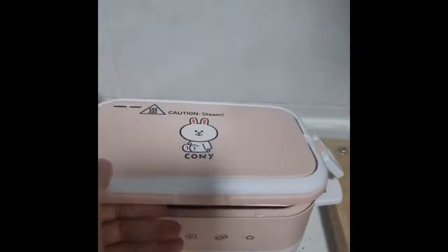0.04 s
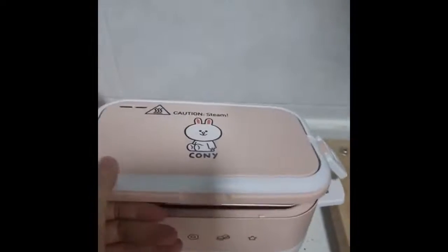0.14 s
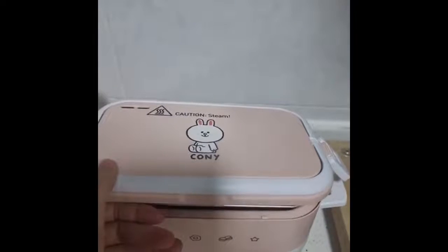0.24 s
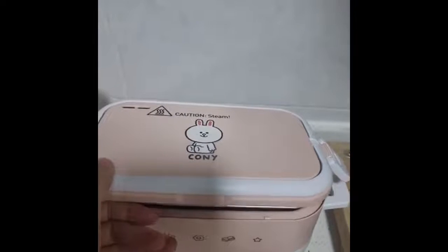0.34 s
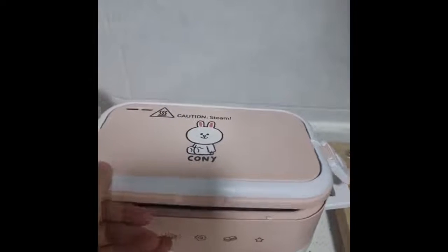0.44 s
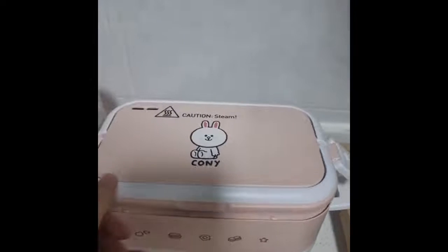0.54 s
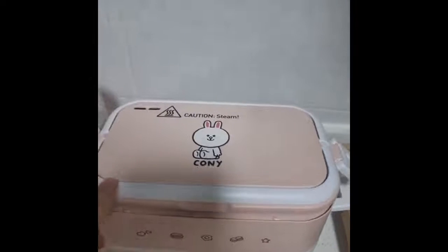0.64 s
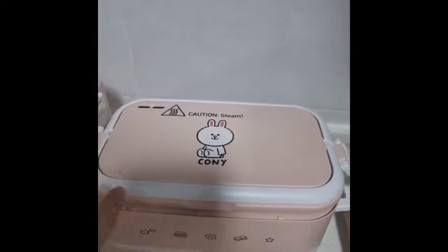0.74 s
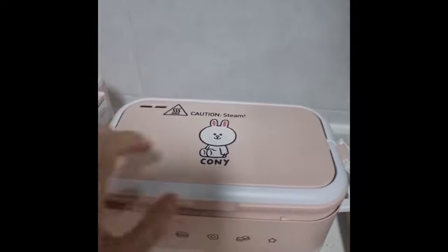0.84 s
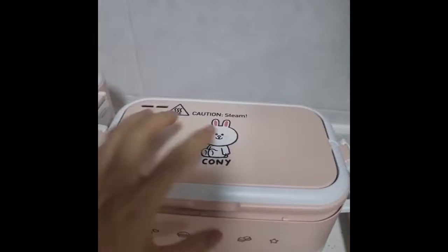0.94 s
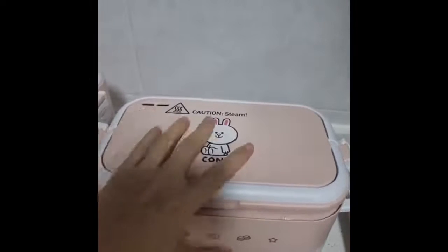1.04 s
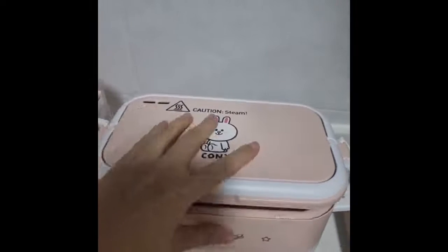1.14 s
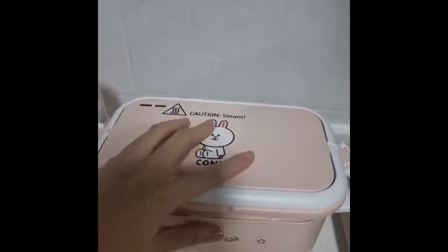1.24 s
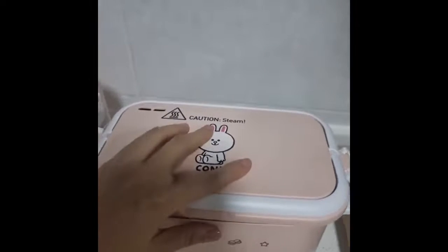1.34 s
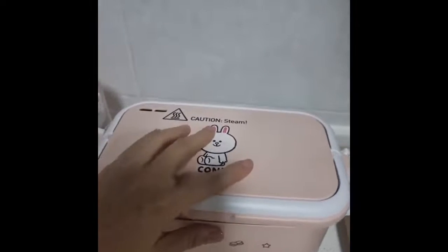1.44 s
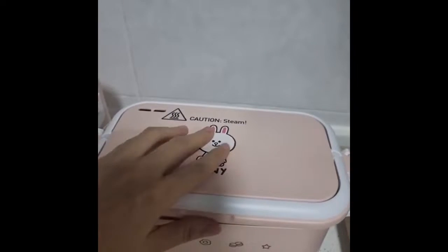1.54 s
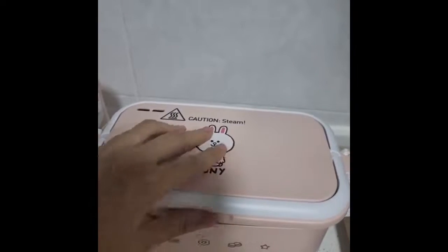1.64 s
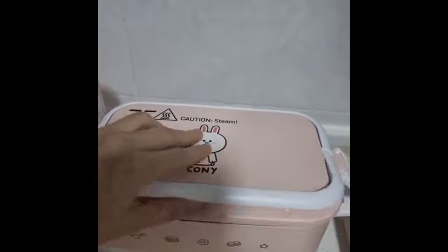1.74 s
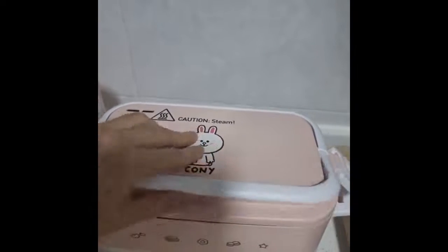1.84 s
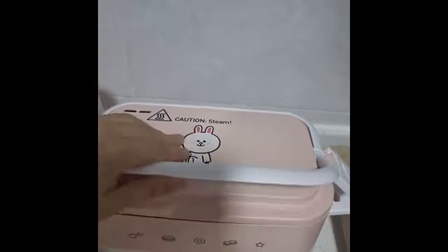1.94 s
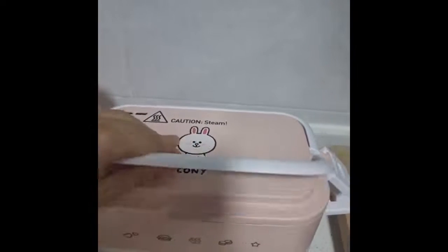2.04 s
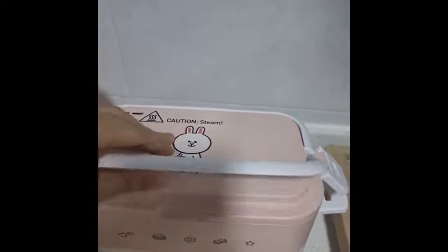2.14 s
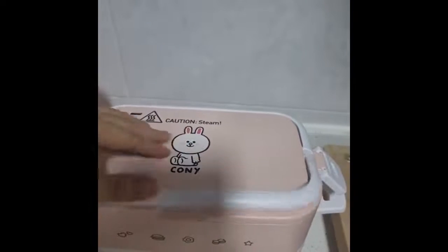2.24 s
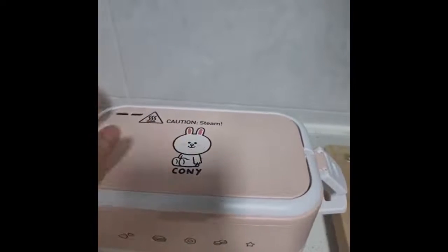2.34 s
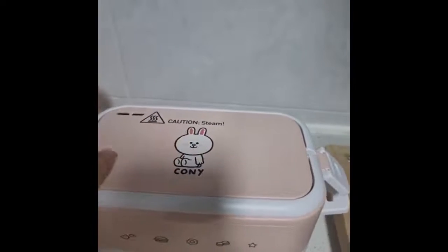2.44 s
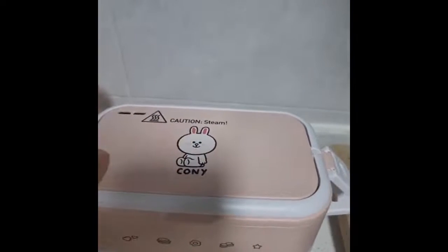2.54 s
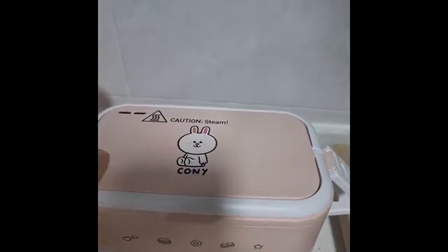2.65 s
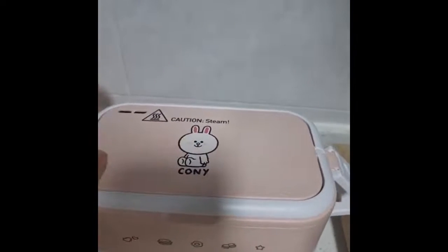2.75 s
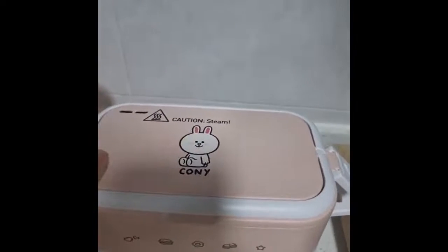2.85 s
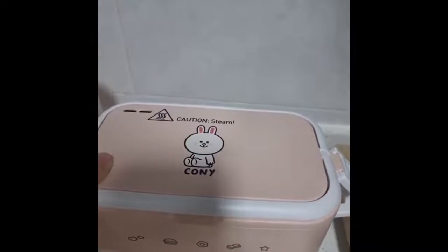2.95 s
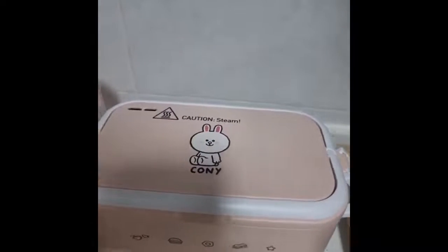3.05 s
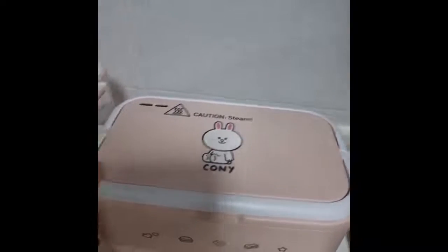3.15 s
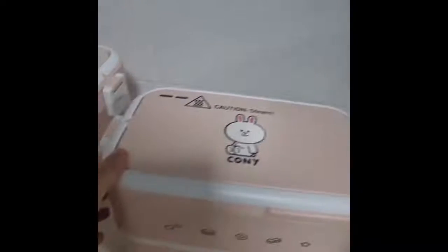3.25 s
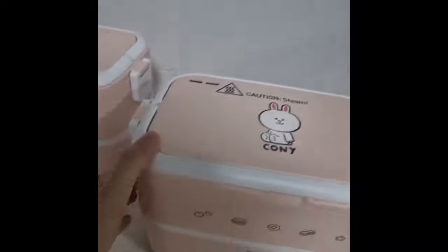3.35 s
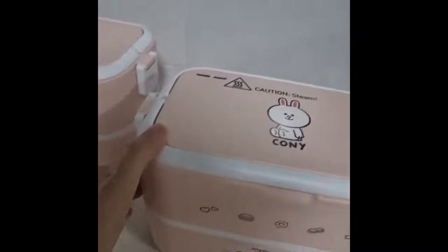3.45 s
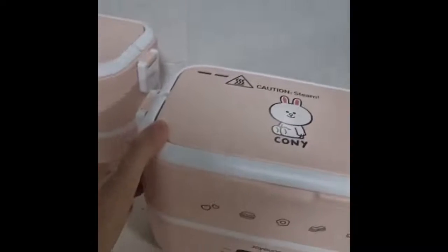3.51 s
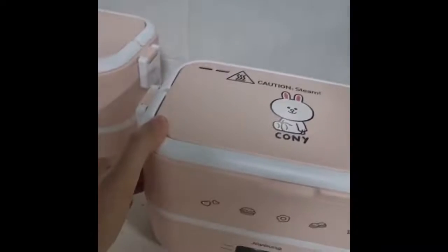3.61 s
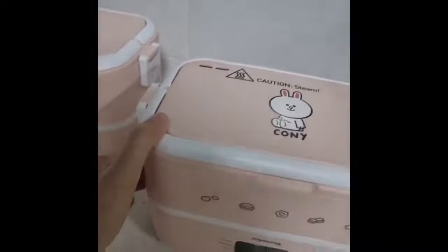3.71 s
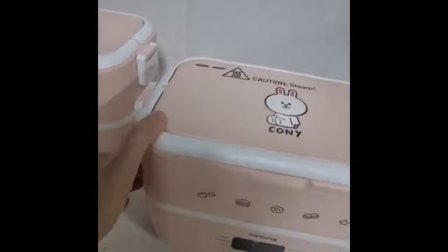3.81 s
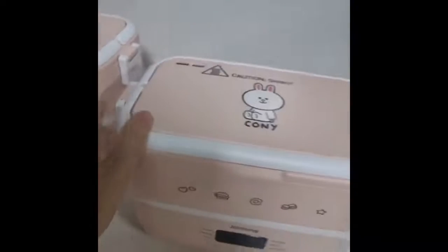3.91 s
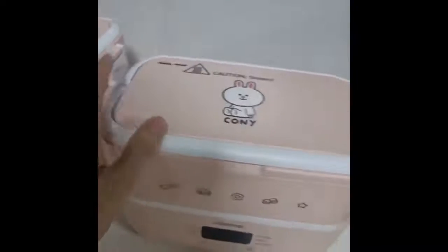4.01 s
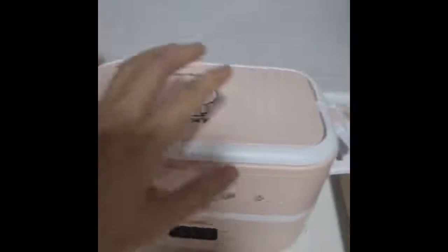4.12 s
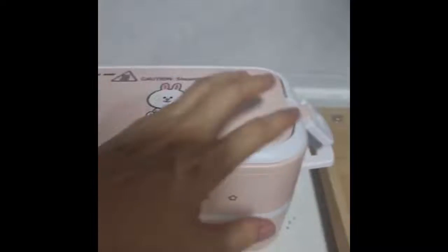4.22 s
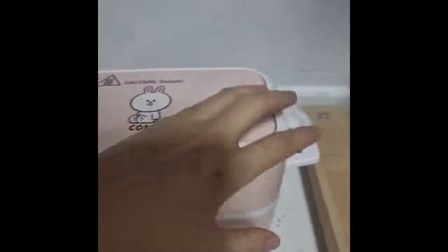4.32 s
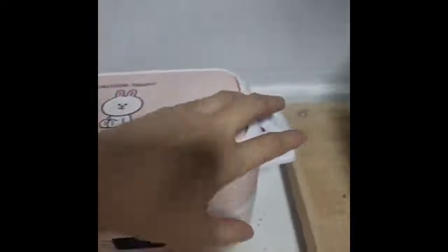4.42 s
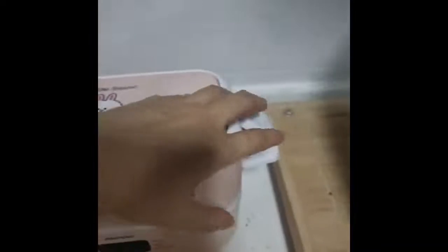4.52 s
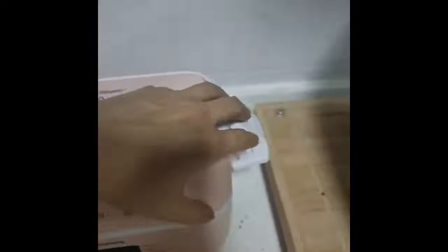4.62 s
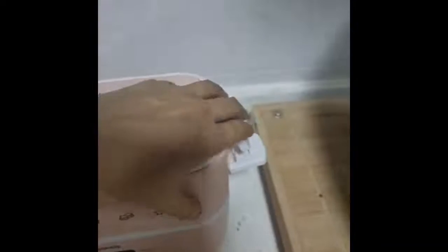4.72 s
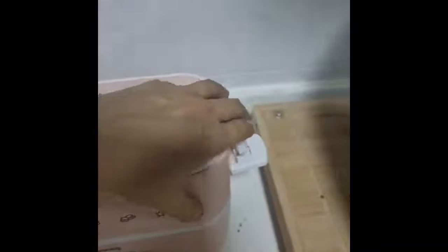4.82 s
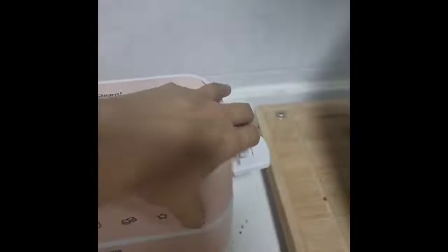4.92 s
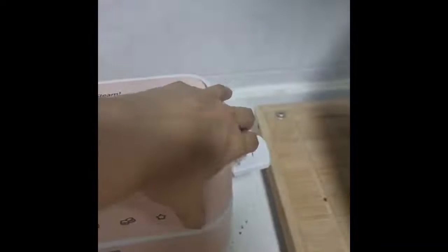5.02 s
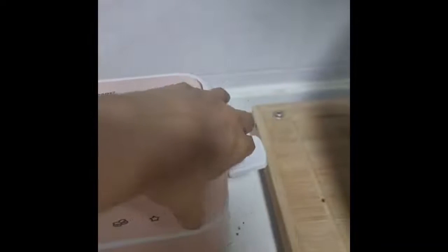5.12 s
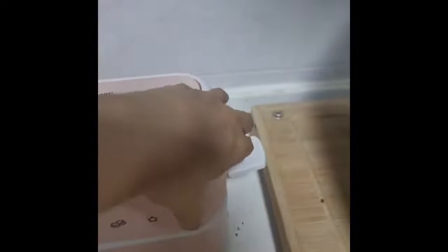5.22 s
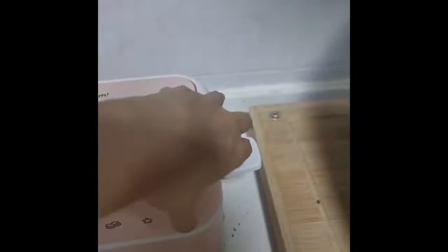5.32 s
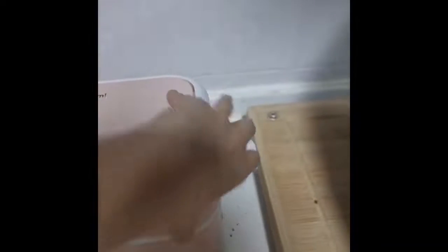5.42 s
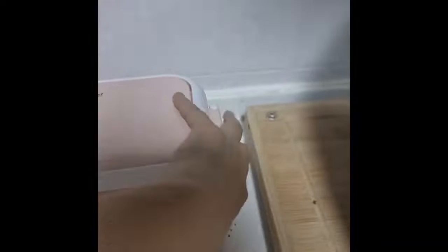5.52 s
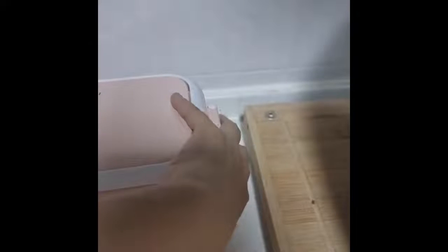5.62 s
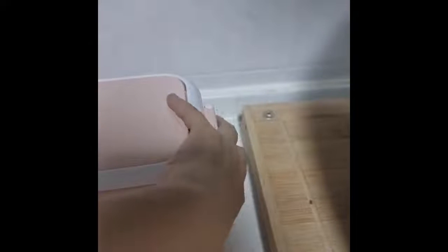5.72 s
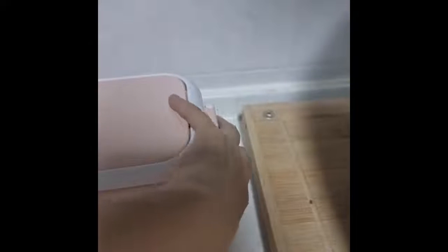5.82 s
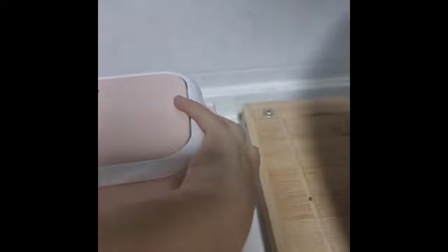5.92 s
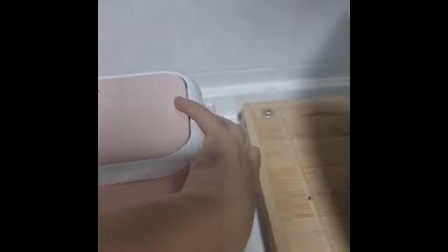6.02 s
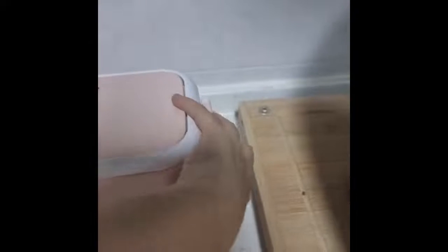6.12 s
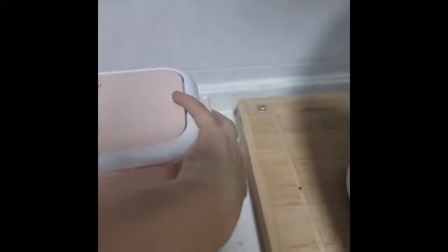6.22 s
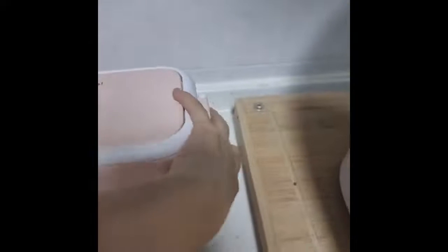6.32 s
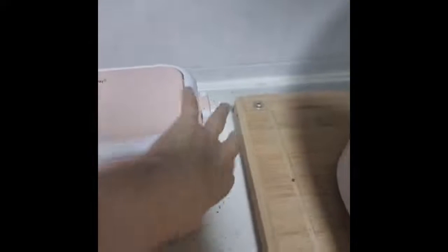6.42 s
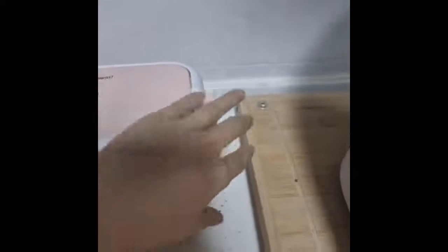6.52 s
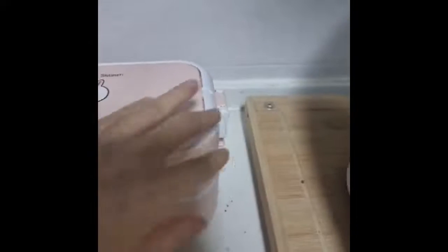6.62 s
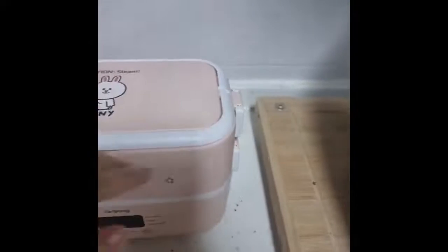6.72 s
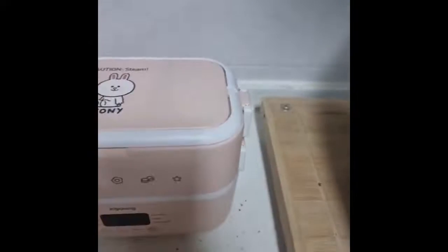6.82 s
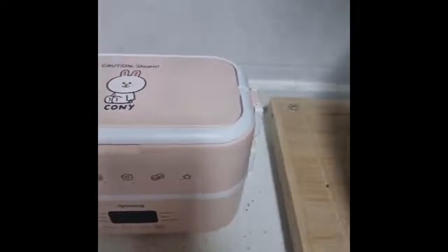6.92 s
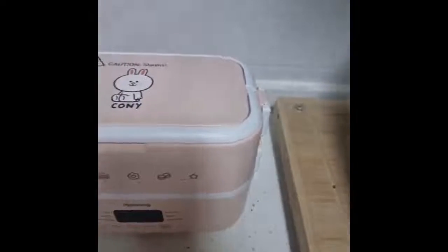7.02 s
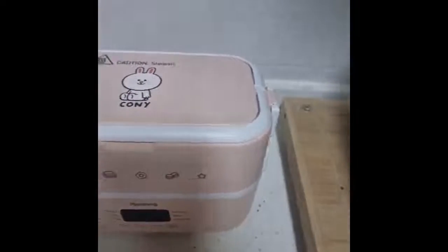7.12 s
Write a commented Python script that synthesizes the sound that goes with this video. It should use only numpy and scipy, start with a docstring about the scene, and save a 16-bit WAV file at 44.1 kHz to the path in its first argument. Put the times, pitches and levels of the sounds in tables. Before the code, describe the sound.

A phone held near a plastic food container picks up light lid knocks and loose rattles, growing firmer as the lid is pushed home. Short gritty rasps run into some hits. Then bright latch clacks, much louder than the earlier taps, ring the hollow box and die quickly in the hard-walled kitchen. Between them only quiet low drone and air remain.

```python
"""A plastic lunch box is closed on a kitchen counter: lid set on and pressed home, then side latches snapped shut.
Each blow sums crowded wall modes, clear modes and rattle, coloured by hardness and place of contact.
Short rasps of shaped noise swell into some of the blows.
The tiled kitchen is a short noise tail, over motor hum and air noise; two phone ports pick it up close by.
"""
import sys
import numpy as np
from scipy import signal
from scipy.fft import rfft, irfft
from scipy.io import wavfile

SR = 44100
rng = np.random.default_rng(int(sys.argv[2]) if len(sys.argv) > 2 else 0)


def to_wav(s):
    """Save 16-bit WAV."""
    ch = np.atleast_2d(s).T  # columns
    pcm = np.round(np.clip(ch, -1, 1) * 32767)  # PCM
    wavfile.write(sys.argv[1], SR, pcm.astype(np.int16))


N = 315756
RING_S = np.arange(2 ** 14) / SR  # time since a blow
BANDS_HZ = 125 * 2 ** (np.arange(20) / 3)
TREBLE_HZ, HOLLOW_HZ = 1494, 344  # hardness acts above the first, boom below the second
AIR_DB = -62.5  # air rms above 130 Hz
STOP_S, TOP_HZ = 6.87, 9600

# Soft kitchen air noise: freq_hz, density_db (relative, per Hz)
AIR_COLOUR = [(15, -20.5), (36, -9), (48, -14.5), (62, -0.5), (97, 3), (122, -15), (200, -15.5),
              (310, -11.5), (480, -17.5), (1000, -20), (1900, -26.5), (3900, -39.5), (6600, -41.5),
              (7500, -49), (9000, -80.5)]
# Steady motor tones: freq_hz, rms_db
MOTOR_TONES = [(75.4, -61.5), (129.2, -71.5), (159, -73)]
# Radiation of the plastic walls: freq_hz, gain_db
WALL_RADIATION = [(110, -4.5), (180, -13.5), (240, 1.5), (420, -1), (550, -12.5), (680, -3.5), (1050, 1.5),
                  (1900, -3), (3100, -0.5), (4200, -1.5), (6800, 1.5), (8000, -4), (9300, -30.5)]
# Modes of the lid on its rim: freq_hz, level_db, t60_s, port_phase_rad
LID_MODES = [(232, 1.5, 0.17, 0.43), (268, -6, .13, 2.6), (322, -9.5, .08, .45), (360, -6.5, .08, 1.7),
             (520, -5.5, 0.15, 1.8), (544, -2.5, 0.15, 2.1), (713, -9.5, .15, 2), (1034, -7.5, .1, .7),
             (1110, -7.5, .09, 2.7), (1219, -7, .08, 2.7), (1360, -6.5, 0.13, 2), (1570, -13.5, .08, 2.5),
             (1740, -12.5, .12, 5.9), (2680, -6, 0.16, 5.9), (2730, -13.5, .1, 1), (3000, -10.5, .1, 4.5),
             (4260, -15.5, 0.15, 2.7), (4726, -13, 0.11, 5), (4985, -13, 0.13, 1.1), (5572, -12.5, 0.11, 3),
             (6380, -13.5, .19, 1), (6640, -8, .14, 1.6), (6860, -9.5, 0.12, 1.5), (7340, -16.5, .17, 1.5)]
# Modes of the closed box, rung through its latches: freq_hz, level_db, t60_s, port_phase_rad
BOX_MODES = [(233.8, 1.5, 0.12, 0.57), (265.5, -9, 0.17, 1.1), (328.5, -4, 0.17, 0.69),
             (395.3, -10.5, 0.28, 3.3), (514, -6, 0.25, 1.3), (532, -5.5, .22, 2.44), (555, -6, 0.16, 5),
             (635, -16.5, 0.05, 1.9), (726, -1, 0.12, 2.06), (859, -9.5, 0.065, 1.6),
             (998, -6.5, 0.086, .68), (1141, -8.5, 0.13, 3.57), (1420, -6.5, .1, 1.5),
             (1544, -5.5, .1, 3.1), (1546, -18.5, 0.065, 1.2), (1674, -9.5, 0.088, 1.8),
             (2040, -4.5, 0.1, 2.6), (2580, -16, 0.07, 2.8), (2880, -11, .12, 5.2), (3320, -19.5, .14, 2.4),
             (3730, -14.5, 0.084, 4), (4050, -6.5, 0.14, 2.2), (5442, -17.5, 0.11, 1.6),
             (6860, -9.5, 0.19, 0.94), (7640, -10, .15, 0.85)]
# Lid nudged, dropped, bouncing, touched by a hand, pressed home in jerks, grip shifted:
# start_s, strength_db, hardness_db_per_octave, boom_db, wall_t60_s (at 1 kHz), rattle_db, crack_db,
# boom_lean_right_db, spots [(freq_hz, lift_db, width_octaves)]
LID_BLOWS = [(0.003, -62, -5.5, -3.5, 0.093, -10, -5, 0.45, [(1393, 11.5, 0.12)]),
             (0.268, -67, 2.5, 10.5, 0.1, -12, -13, 0, [(2570, 9, 0.074)]),
             (0.301, -56, -2.5, 3, 0.073, -8, -9, -0.21, [(1400, 15, 0.078)]),
             (0.309, -62, -2.5, 2, 0.026, -12, -13, 0, [(346, 16.5, .3)]),
             (0.3578, -54.5, 0, 10.5, 0.045, -11, 1, -1.4, [(229.5, 11.5, 0.045), (545, 4, 0.23),
             (1480, 6.5, 0.3), (2400, 9.5, 0.24)]),
             (0.3755, -56, -6, 4.5, 0.03, -22, -7, -1, [(227, 9, 0.088), (550, 4, 0.1), (390, 7, 0.17)]),
             (0.390, -53.5, -4, 2.5, 0.03, -12, -3, -1, [(1180, 11.5, 0.098)]),
             (0.3996, -59.5, -2, -2, 0.025, -6, 0, 0, [(2700, 2, 0.12), (5540, 13.5, 0.061)]),
             (0.903, -54.5, -3, 5.5, 0.021, -6, -2, -0.61, [(219, 1.5, 0.13), (1350, 5.5, 0.32),
             (3200, 3.5, 0.27), (8100, -12.5, 0.24)]),
             (1.089, -49, -6.5, 3.5, 0.059, -1.5, -8, 0.11, [(547, 8.5, 0.26)]),
             (1.121, -50, -7, -8.5, 0.15, -15, -13, 0, [(2500, 0.5, 0.29)]),
             (1.196, -62, -11.5, -0.5, 0.24, -31, -14, 0.21, [(460, 5.5, 0.54)]),
             (1.361, -67, -5.5, -9, 0.17, -11, -16, 0, [(6470, 5.5, 0.11)]),
             (1.538, -56, -10.5, 1.5, 0.45, -20, -7, -0.3, [(2560, 2.5, 0.52)]),
             (1.6715, -58.5, -16, 5.5, 0.054, -24, 1, -0.28, [(300, 4, 0.86)]),
             (1.6785, -57.5, 2.5, 4.5, 0.035, -24, -9, 0, [(2680, -7, 0.085)]),
             (1.6816, -51.5, 3.5, 1.5, 0.034, -10.5, -2, 0.45, [(1240, 6.5, 0.13), (2780, 4, 0.12),
             (3720, -19, 0.11)]), (1.685, -51.5, 2, 2.5, 0.025, -12, -6.5, 0, [(1240, 8.5, 0.12),
             (2870, 4, 0.078), (3720, -12, .06)]),
             (1.8655, -48.5, 1, 2.5, 0.055, -26, -6.5, 0, [(489, 5.5, 0.21), (1270, 11.5, 0.18),
             (1770, 7, 0.086), (8700, -16, 0.095)]),
             (1.8715, -52, 2, 8.5, 0.034, -11.5, 7, 0.084, [(275, 4.5, 0.12), (430, 5.5, 0.23),
             (1400, 8.5, 0.24), (8700, -19, 0.15)]),
             (2.12, -43, 2, -4.5, 0.03, -13.5, -8, -1, [(3200, 3.5, 0.2), (650, -1, .4),
             (3900, -6.5, .05)]), (2.1235, -49, 3, -8, 0.016, -13.5, -4, 0, [(5986, 4, .3)]),
             (2.375, -58.5, -11.5, -3.5, 0.37, -9.5, -1.5, 0.2, [(1100, 6, 0.36)]),
             (2.944, -66, -12.5, 9, 0.072, -21, -4, 0, [(696, 13.5, 0.21)]),
             (3.213, -65, -16.5, -6, 0.2, -16, 2, 0, [(560, 14, 0.28)]),
             (4.628, -57, -10.5, 3.5, 0.02, -28.5, 3, -0.9, [(1100, 5.5, .4)]),
             (4.637, -68, -5.5, 5, 0.017, -34, 1.5, 0, [(240, 3, .3)])]
# Left latch over the rim and shut, box rocking and settling, right latch over the rim and shut:
# start_s, strength_db, hardness_db_per_octave, boom_db, wall_t60_s (at 1 kHz), rattle_db, crack_db,
# boom_lean_right_db, spots [(freq_hz, lift_db, width_octaves)]
LATCH_BLOWS = [(2.5945, -42.5, 1.5, -7.5, 0.05, -10, -10.5, -3.5, [(217, 12, 0.13), (700, 4, 0.24),
               (1240, 10, 0.53), (3270, 3.5, 0.2), (4790, -22, .08)]),
               (2.6015, -45.5, -2.5, -4.5, 0.04, -21, 7, 0.5, [(855, 5.5, 0.25), (3100, 6.5, 0.38),
               (4800, -14, .08)]), (3.447, -35, -4, -7.5, 0.03, -11.5, -2, -1, [(265, 8.5, 0.29),
               (545, 6.5, 0.13), (730, 5, 0.13), (2100, 4, 0.44)]),
               (3.464, -45, -4, -11.5, 0.084, -15, -14.5, 15, [(380, 3.5, 0.41), (780, 5, 0.19)]),
               (3.4985, -52.5, -4, -5.5, 0.04, -9, 0, 0.5, [(605, 5.5, 0.4)]),
               (3.527, -56.5, -2.5, 0.5, 0.054, -10, -6, -1, [(695, 11.5, 0.41)]),
               (3.583, -62.5, -8, 8, 0.04, -4.5, -13, -2, [(397, 1, 0.4)]),
               (4.9572, -39.5, -3, -16, 0.068, -36.5, -1.5, -4, [(357, 4.5, 0.094), (634, 6, 0.2),
               (1150, 5.5, 0.76)]), (4.9605, -41.5, -2, -12, 0.012, -14.5, 4, -0.5, [(1050, 8.5, 0.23),
               (1800, 1.5, 0.12)]), (4.9695, -53, 1, -7, 0.035, -3, 11, -5, [(2560, 9, 0.59)]),
               (5.3773, -39.5, -5.5, -16, 0.034, -14.5, -1.5, 7, [(845, 4.5, 0.42), (2700, 8.5, 0.48)]),
               (5.9935, -37.5, -3, -6, 0.032, -7, -8, -1.5, [(345, 11, 0.33), (520, 5, 0.33),
               (750, 12, 0.17), (1300, -1, .3), (2600, 4.5, 0.47)])]
# Short rasp swelling before a blow: end_s, level_db, length_s, hardness_db_per_octave
RASPS = [(0.295, -52, 0.072, -1.5), (0.406, -54, 0.028, 5), (1.086, -52, .05, -3), (1.146, -43, 0.028, -10),
         (1.674, -40.5, 0.021, -2.5), (1.862, -44, 0.023, -3.5), (2.592, -35, 0.016, 1),
         (3.442, -41, .016, 0.5), (4.955, -36, .006, 4), (5.373, -43, 0.0097, -0.5),
         (5.992, -44.5, 0.027, 5)]
# Right port relative to left: freq_hz, gain_db
PORT_TILT = [(80, -0.9), (240, 4.5), (550, 1.5), (2000, .5), (4300, 1), (7500, 4)]


def undb(db):
    """Decibels to amplitude."""
    return 10 ** (np.asarray(db) / 20)


def unit(x):
    """Scale to a mean energy of one per channel."""
    return x / np.sqrt(np.mean(np.sum(x ** 2, axis=-1)))


def on_log(hz, points):
    """Interpolate (freq_hz, level_db) points on a log-frequency axis."""
    point_hz, point_db = np.transpose(points)
    return np.interp(np.log(np.maximum(hz, 1)), np.log(point_hz), point_db)


def port_noise(size, lag_s=0.00039, blur_hz=1500):
    """Two-port noise spectrum: alike in the bass, opposed near 1 kHz, unrelated in the treble."""
    hz = np.fft.rfftfreq(size, 1 / SR)
    likeness = np.cos(2 * np.pi * hz * lag_s) * np.exp(-(hz / blur_hz) ** 2)
    mid, side = rfft(rng.standard_normal((2, size)))
    mid = mid * np.sqrt(1 + likeness)
    side = side * np.sqrt(1 - likeness)
    return hz, np.array([mid + side, mid - side])


def shaped_noise(size, points):
    """Two-port noise of a given colour, rms one."""
    hz, spectrum = port_noise(size)
    return unit(irfft(spectrum * undb(on_log(hz, points)), size)) * np.sqrt(size)


def hum(drone_hz=74, width_hz=12, drone_db=-53):
    """Motor drone as noise in a low room resonance, plus faint steady tones and air noise."""
    hz, spectrum = port_noise(N)
    resonance = 1 / (1 + ((hz - drone_hz) / width_hz) ** 4)
    drone = unit(irfft(spectrum * resonance, N)) * np.sqrt(N)
    t_s = np.arange(N) / SR
    tones = 0
    for tone_hz, rms_db in MOTOR_TONES:
        phase = 2 * np.pi * (tone_hz * t_s + rng.random())
        tones = tones + undb(rms_db) * np.sqrt(2) * np.sin(phase)
    air = shaped_noise(N, AIR_COLOUR)
    above_drone = signal.sosfilt(signal.butter(4, 130, "high", fs=SR, output="sos"), air)
    return undb(drone_db) * drone + tones + undb(AIR_DB) * air / np.std(above_drone)


def wobble(steps):
    """Random wander of spread near one: straight lines between new values at whole steps."""
    return np.interp(steps, np.arange(500), rng.standard_normal(500))


def decay(t60_s, rise_s):
    """Power that builds up and dies away; sums to one."""
    amplitude = (1 - np.exp(-RING_S / rise_s)) * np.exp(-np.log(1000) * RING_S / t60_s)
    power = amplitude ** 2
    return power / power.sum()


def coloured(x, db):
    """Causal minimum-phase filter with a given gain per frequency; its peaks ring on."""
    cepstrum = irfft(np.log(undb(db)))
    half = len(cepstrum) // 2
    cepstrum[1:half] *= 2
    cepstrum[half + 1:] = 0
    return irfft(rfft(x) * np.exp(rfft(cepstrum)))


def add(track, start_s, x):
    """Mix x into the track."""
    i = max(int(start_s * SR), 0)
    track[:, i:i + x.shape[1]] += x[:, :N - i]


def dense_ring(t60_s, contact_db, room_db, contact_t60_s=0.0041, room_t60_s=0.35, damping=0.26,
               rise_cycles=0.49, patchy_db=4.5, room_patchy_db=1.0, patch_hz=220,
               flutter_db=2.0, flutter_s=0.0051, room_top_hz=7800, linger_db=5.0, linger_hz=75):
    """Crowded modes as third-octave noise: contact, ringing walls, then the tiled kitchen."""
    hz, spectrum = port_noise(len(RING_S))
    patches = wobble(hz / patch_hz)  # each spot reaches some groups of modes and misses others
    lingering = np.minimum(wobble(hz / linger_hz), .5)  # narrow groups are weak in the tail
    near_db = patchy_db * patches
    far_db = room_patchy_db * np.minimum(patches, 1) + linger_db * lingering
    spectra = np.array([spectrum * undb(near_db), spectrum * undb(far_db)])
    out = 0
    for centre_hz in BANDS_HZ:
        thirds = 3 * np.log2(np.maximum(hz, 1) / centre_hz)
        band_gain = np.cos(np.pi / 2 * np.clip(thirds, -1, 1)) ** 2
        near, far = irfft(spectra * band_gain)
        slow = 1000 / centre_hz  # low modes build up later and last longer
        rise_s = rise_cycles / centre_hz
        contact = undb(contact_db) ** 2 * decay(contact_t60_s * np.sqrt(slow), 0.00019 + rise_s)
        walls = decay(t60_s * slow ** damping, 0.002 + rise_s)
        room = undb(room_db) ** 2 * decay(room_t60_s * slow ** damping, 0.00092)
        room = room / (1 + (centre_hz / room_top_hz) ** 16)  # highest treble is soaked up
        power = contact + walls + room + 1e-30
        room_share = room / power
        band = unit(near) * (1 - room_share) + unit(far) * room_share
        uneven = undb(flutter_db * wobble(RING_S / flutter_s))
        out = out + unit(band * uneven * np.sqrt(power)) * undb(on_log(centre_hz, WALL_RADIATION))
    return out


def clear_modes(modes, spot_db=1.0, detune=0.0039, rise_s=0.0023):
    """Decaying sines of lid or box; grip and struck spot change each a little."""
    out = 0
    draws = rng.standard_normal((len(modes), 3))
    for (hz, level_db, t60_s, port_phase_rad), (size, shift, sign) in zip(modes, draws):
        phase = 2 * np.pi * hz * (1 + detune * shift) * RING_S + np.array([[0], [port_phase_rad]])
        envelope = np.exp(-np.log(1000) * RING_S / t60_s) * (1 - np.exp(-RING_S / rise_s))
        mode = np.sin(phase) * envelope
        out = out + np.sign(sign) * unit(mode) * undb(level_db + spot_db * size)
    return out


def rattle(ticks_per_s=420, t60_s=0.32, tick_t60_s=0.018, scatter_db=4, low_hz=500, high_hz=7500,
           patchy_db=5, patch_hz=170):
    """Loose plastic parts tick at random as a blow dies away, in narrow resonances."""
    hits = rng.random(len(RING_S)) < ticks_per_s / SR
    touches = hits * undb(scatter_db * np.clip(rng.standard_normal(len(RING_S)), -2, 2))
    touches = touches * np.sqrt(decay(t60_s, 0.003))
    hz, spectrum = port_noise(len(RING_S))
    tick = irfft(spectrum) * np.sqrt(decay(tick_t60_s, .0001))
    thin = hz ** 2 / (hz ** 2 + low_hz ** 2) / np.sqrt(np.maximum(hz, low_hz))  # small parts lack bass
    soft = 1 / (1 + (hz / high_hz) ** 12)  # plastic soaks up the highest treble
    ticks = irfft(rfft(touches) * rfft(tick) * thin * soft)
    resonance_db = patchy_db * np.minimum(wobble(hz / patch_hz), 1)
    return unit(coloured(ticks, on_log(hz, WALL_RADIATION) + resonance_db))


def blow_colour(hz, strength_db, hardness, boom_db, spots):
    """Spectrum in dB: hard edges reach the treble, flat pushes pump the hollow, spots lift or cut."""
    treble_octaves = np.log2(np.hypot(1, hz / TREBLE_HZ))
    hollow = 1 / (1 + np.square(hz / HOLLOW_HZ) ** 2)
    lift_db = 0
    for centre_hz, peak_db, width_octaves in spots:
        octaves = np.log2(np.maximum(hz, 1) / centre_hz)
        lift_db = lift_db + peak_db * np.exp(-.5 * (octaves / width_octaves) ** 2)
    return strength_db + hardness * treble_octaves + boom_db * hollow + lift_db


def knocks(blows, modes, wall_db, ring_db, room_db):
    """Each blow rings walls and clear modes and shakes loose parts, filtered by its contact."""
    out = np.zeros((2, N))
    hz = np.fft.rfftfreq(len(RING_S), 1 / SR)
    for start_s, strength_db, hardness, boom_db, t60_s, rattle_db, crack_db, lean_db, spots in blows:
        walls = undb(wall_db) * dense_ring(t60_s, crack_db, room_db)
        wall_size = np.sqrt(np.sum(walls ** 2) / 2)
        loose = undb(rattle_db) * wall_size * rattle()
        sound = walls + loose + undb(ring_db) * clear_modes(modes)
        ports = []
        for port, side in zip(sound, (-1, 1)):
            port_boom_db = boom_db + side * lean_db / 2
            colour_db = blow_colour(hz, strength_db, hardness, port_boom_db, spots)
            ports.append(coloured(port, colour_db))
        add(out, start_s, np.array(ports) * np.sqrt(.03 * SR))  # strength refers to rms over 30 ms
    return out


def rasps(grit_db=3.5, grit_s=0.0007, swell=1.0, release_s=0.0031):
    """A brief gritty rush of noise swells, then dies fast as the blow begins."""
    out = np.zeros((2, N))
    hz = np.fft.rfftfreq(len(RING_S), 1 / SR)
    rush_colour = [(100, -21.5), (250, -3.5), (1000, -1.0), (3000, -12), (7500, -16), (10000, -41)]
    for end_s, level_db, length_s, hardness in RASPS:
        attack = np.minimum(RING_S / length_s, 1) ** swell
        release = np.exp(-np.maximum(RING_S - length_s, 0) / release_s)
        rush = shaped_noise(len(RING_S), rush_colour)
        grit = undb(grit_db * wobble(RING_S / grit_s))
        colour_db = blow_colour(hz, level_db, hardness, 0, [])
        add(out, end_s - length_s, coloured(rush * grit * attack * release, colour_db))
    return out


def scene():
    """Lid set on and latches shut over the kitchen hum."""
    background = hum()
    lid = knocks(LID_BLOWS, LID_MODES, wall_db=-3.0, ring_db=0.5, room_db=-5.5)
    swells = rasps()
    latches = knocks(LATCH_BLOWS, BOX_MODES, wall_db=-3.5, ring_db=0.0, room_db=-4.5)
    return background + lid + swells + latches


def record(dry):
    """Ports differ a little in colour; the phone cuts the top and falls silent just before the end."""
    tilt_db = on_log(np.fft.rfftfreq(N, 1 / SR), PORT_TILT)
    ports = irfft(rfft(dry) * undb(np.array([-tilt_db, tilt_db]) / 2), N)
    running = np.clip((STOP_S - np.arange(N) / SR) / .01, 0, 1)  # 10 ms fade
    top_cut = signal.ellip(10, .2, 80, TOP_HZ, fs=SR, output="sos")
    return signal.sosfilt(top_cut, ports * running)


dry = scene()
out = record(dry)
to_wav(out)
```